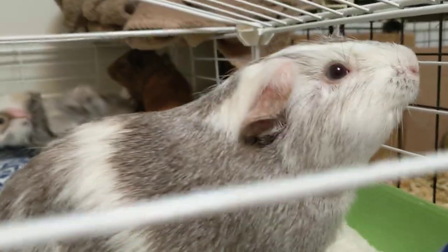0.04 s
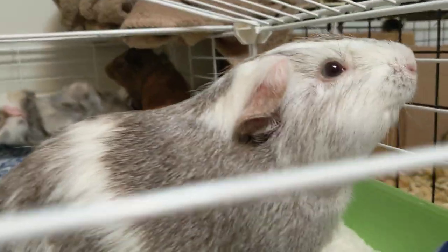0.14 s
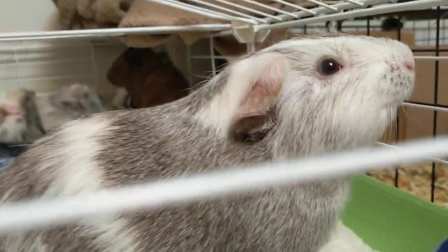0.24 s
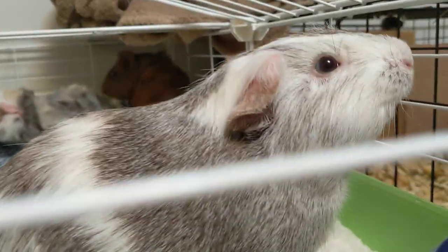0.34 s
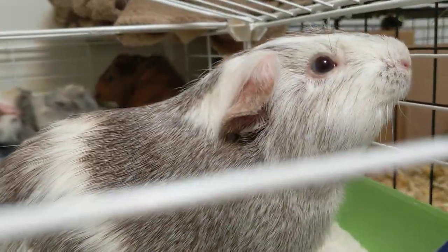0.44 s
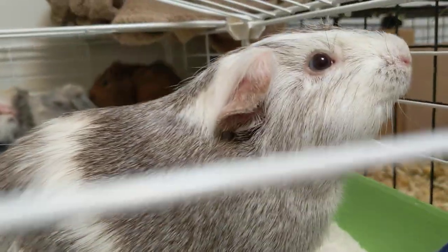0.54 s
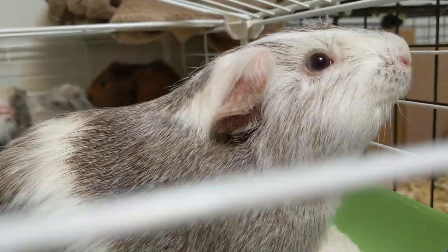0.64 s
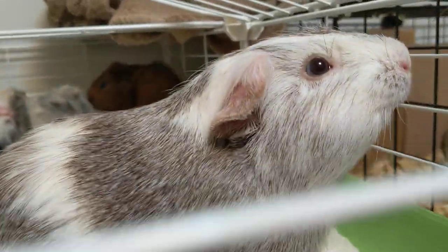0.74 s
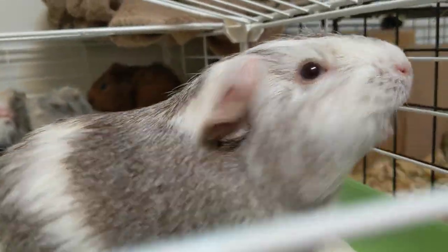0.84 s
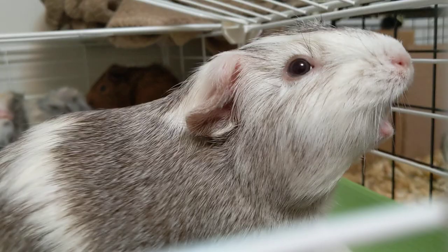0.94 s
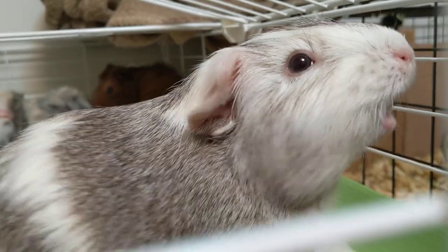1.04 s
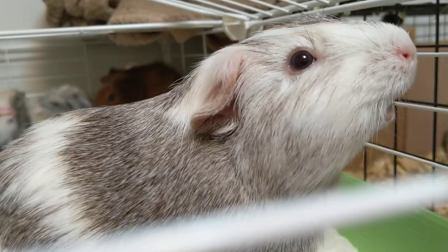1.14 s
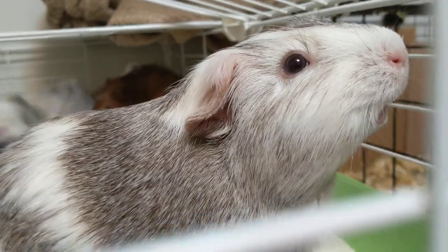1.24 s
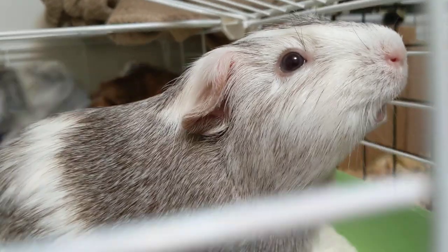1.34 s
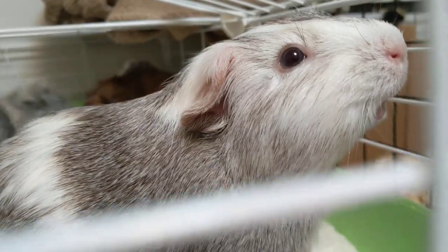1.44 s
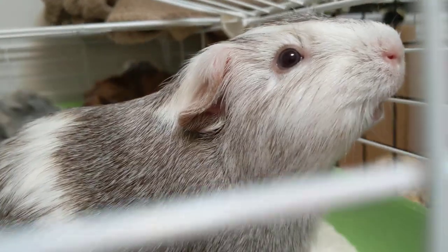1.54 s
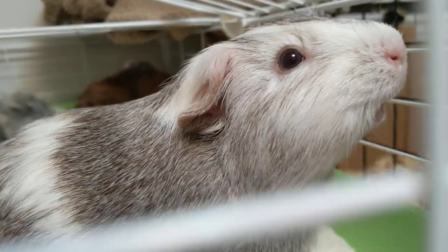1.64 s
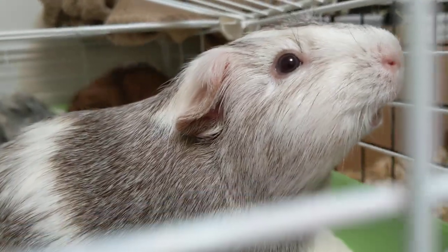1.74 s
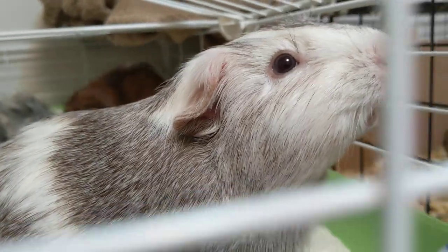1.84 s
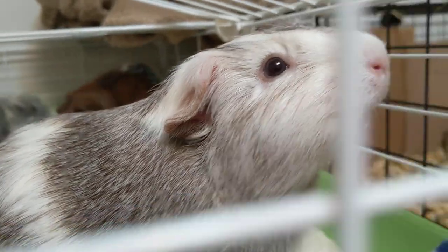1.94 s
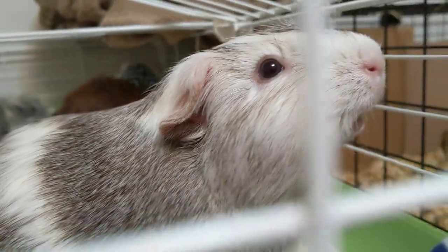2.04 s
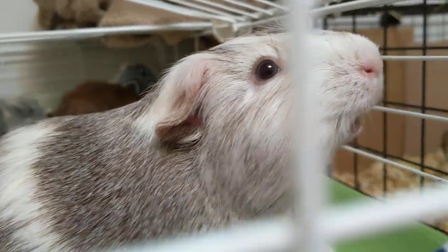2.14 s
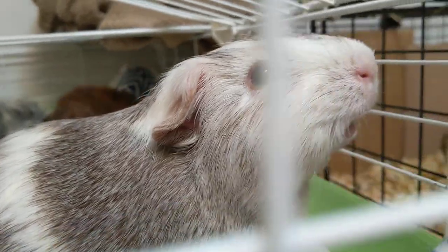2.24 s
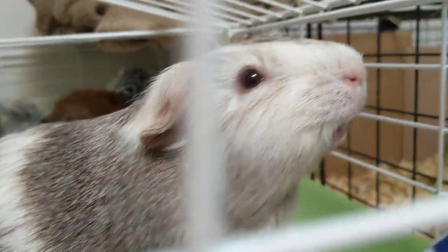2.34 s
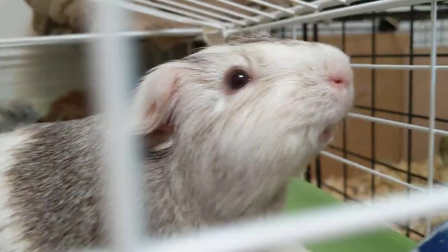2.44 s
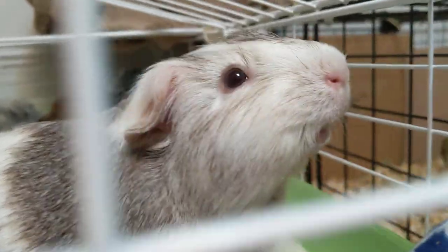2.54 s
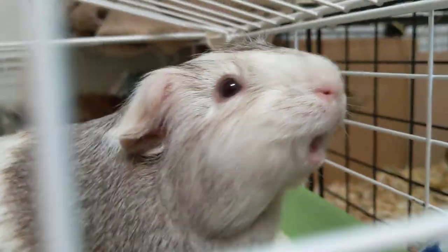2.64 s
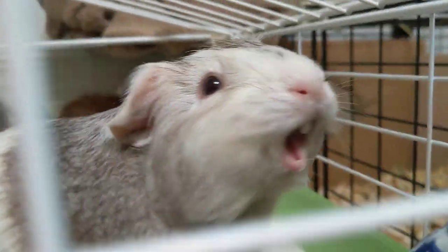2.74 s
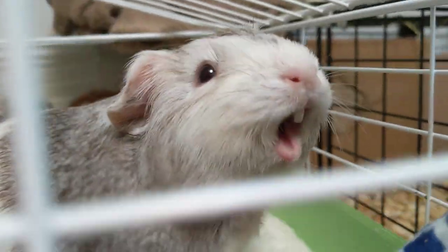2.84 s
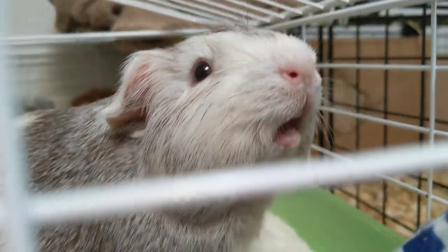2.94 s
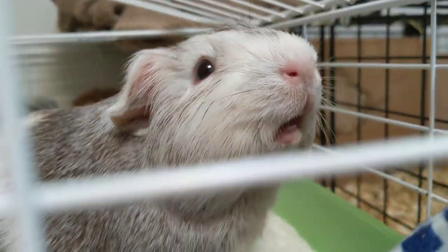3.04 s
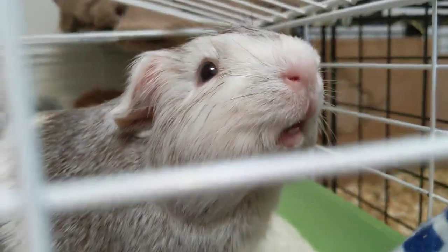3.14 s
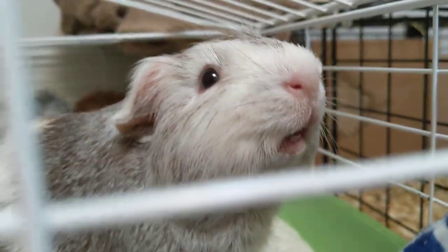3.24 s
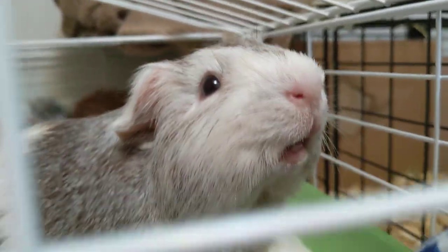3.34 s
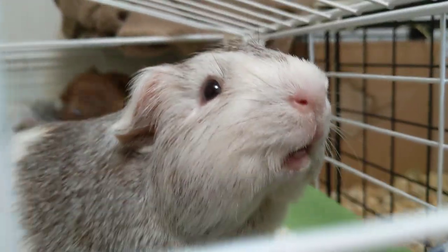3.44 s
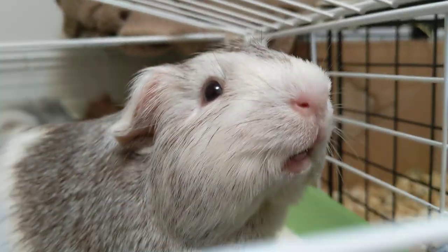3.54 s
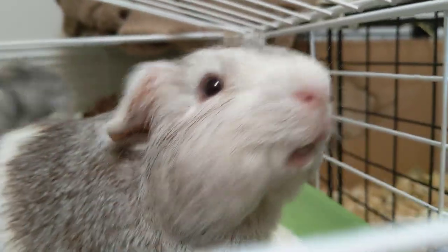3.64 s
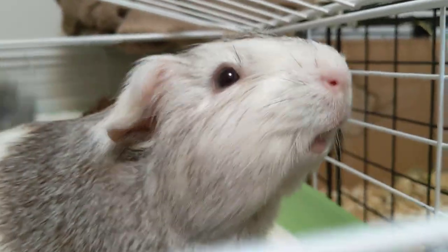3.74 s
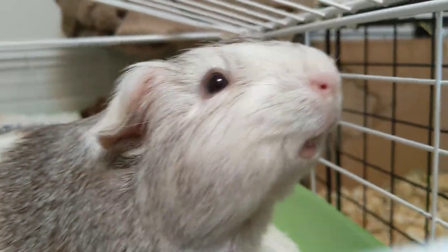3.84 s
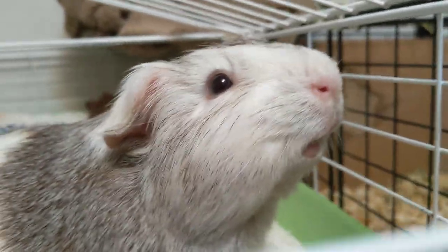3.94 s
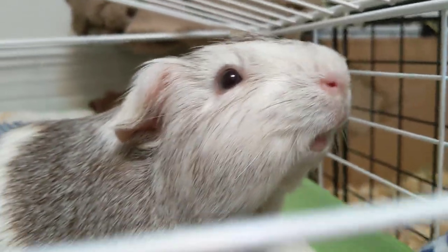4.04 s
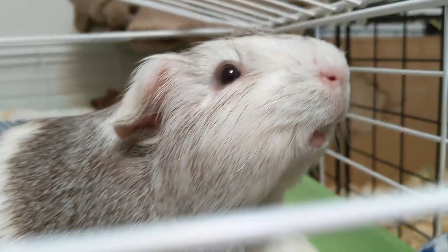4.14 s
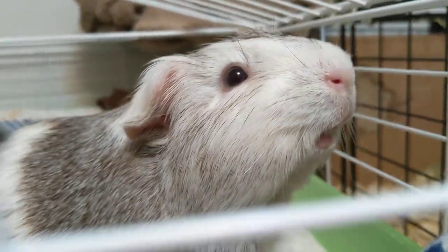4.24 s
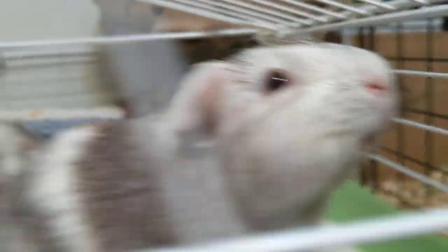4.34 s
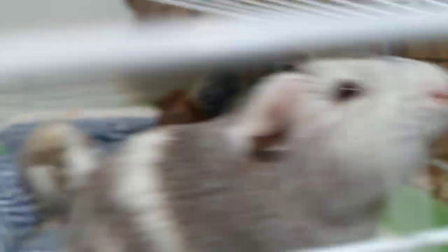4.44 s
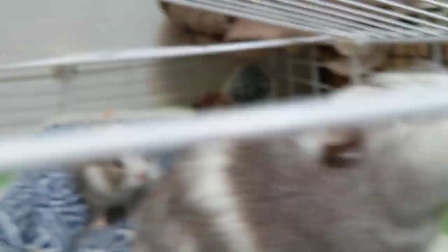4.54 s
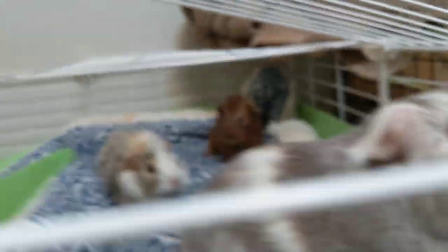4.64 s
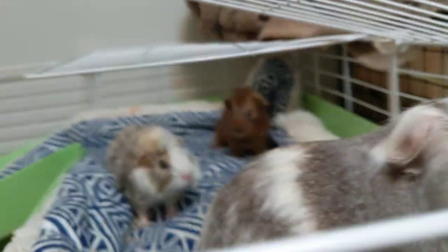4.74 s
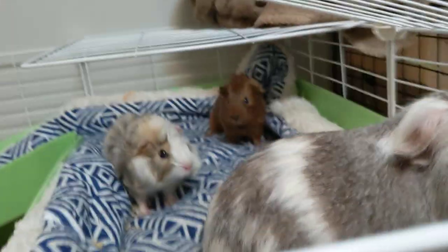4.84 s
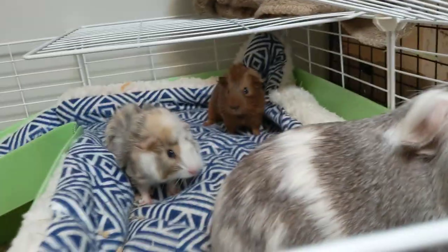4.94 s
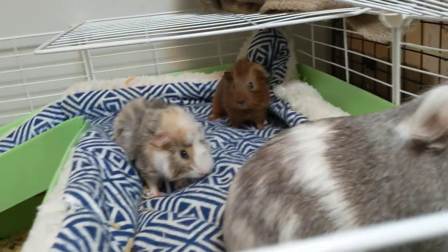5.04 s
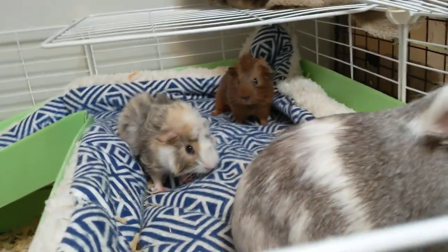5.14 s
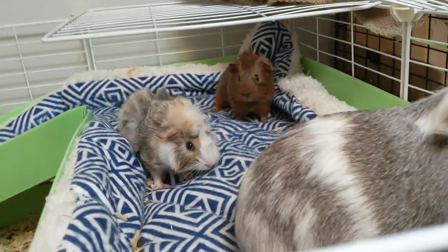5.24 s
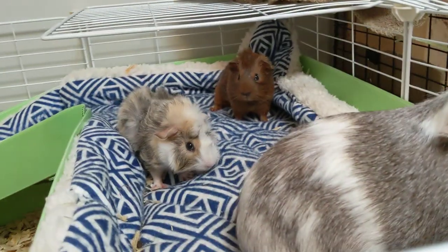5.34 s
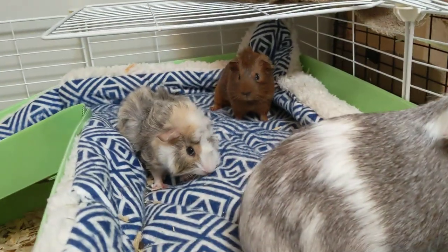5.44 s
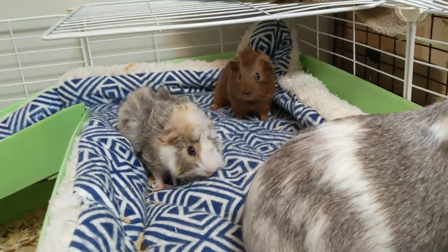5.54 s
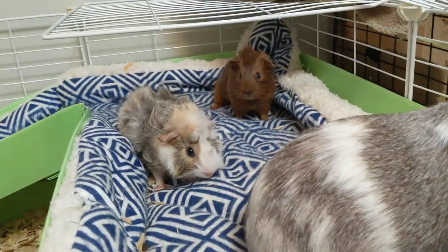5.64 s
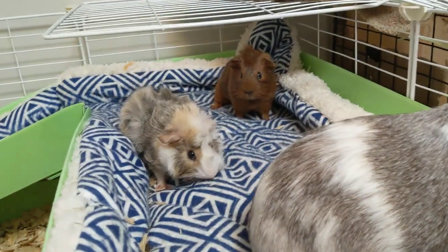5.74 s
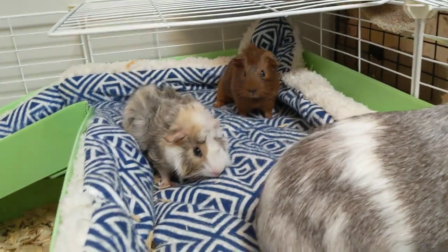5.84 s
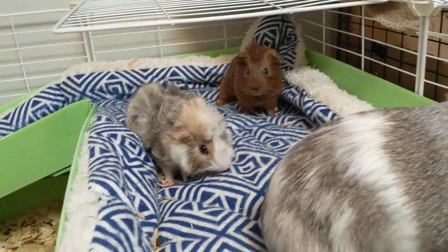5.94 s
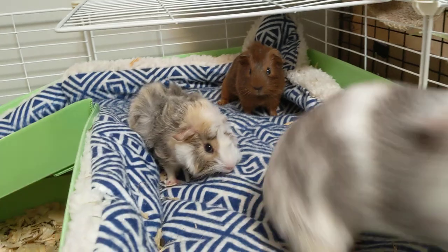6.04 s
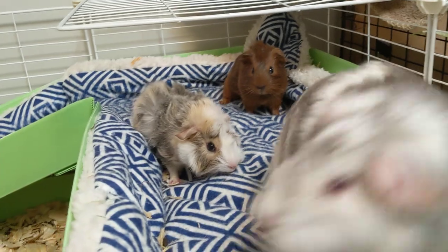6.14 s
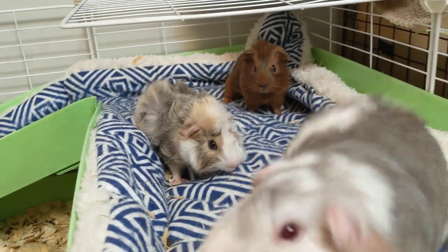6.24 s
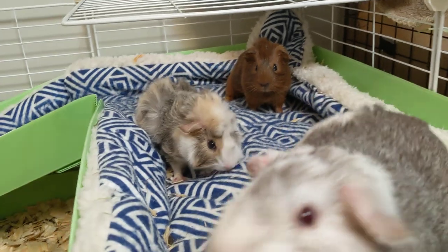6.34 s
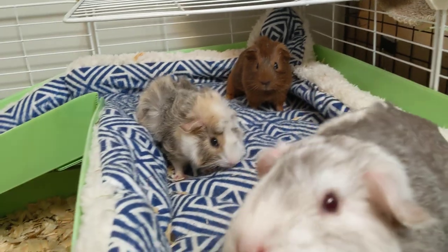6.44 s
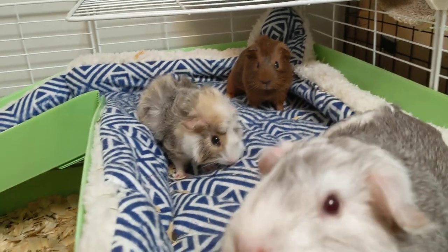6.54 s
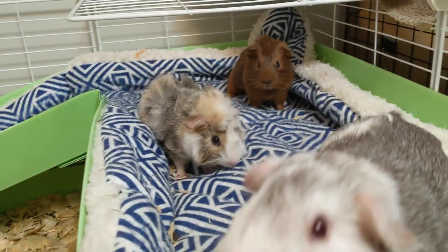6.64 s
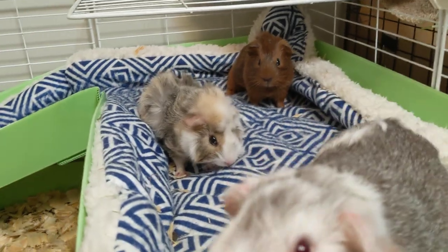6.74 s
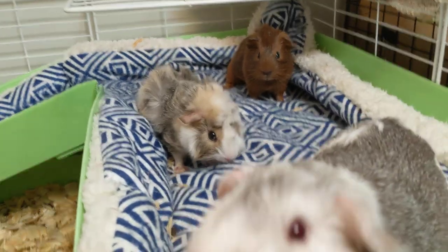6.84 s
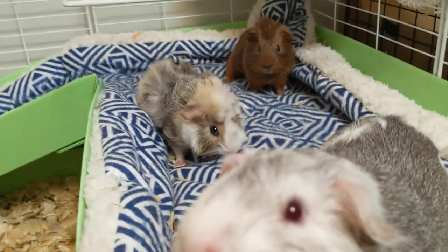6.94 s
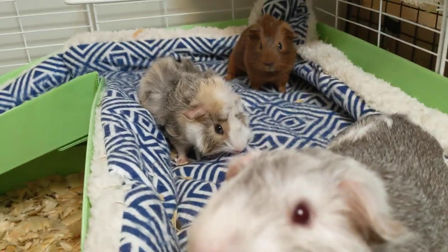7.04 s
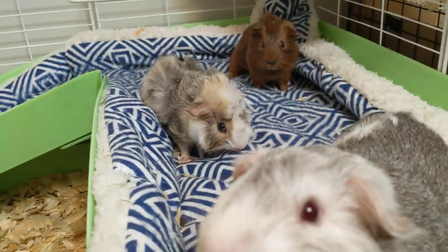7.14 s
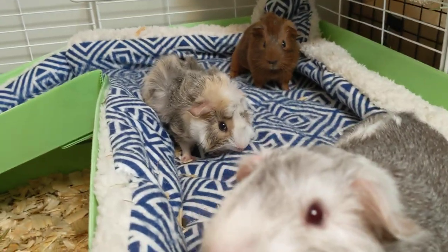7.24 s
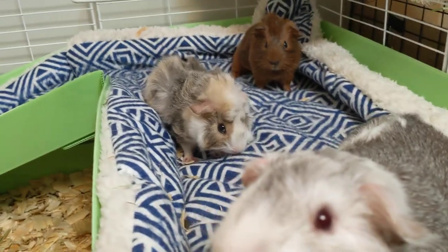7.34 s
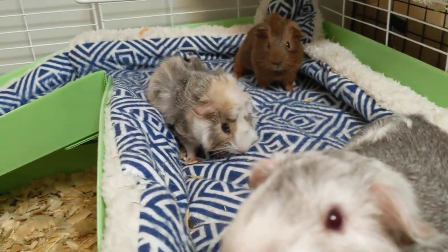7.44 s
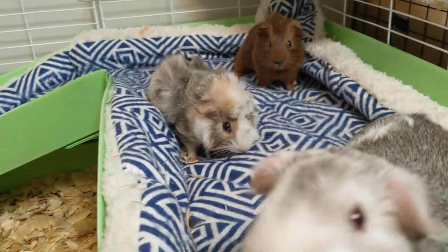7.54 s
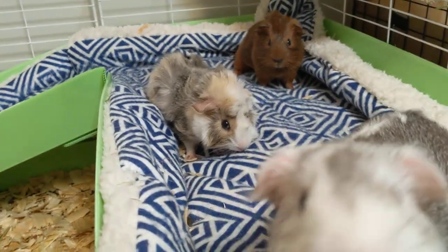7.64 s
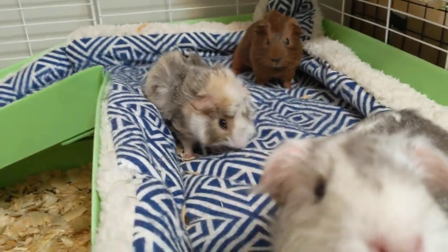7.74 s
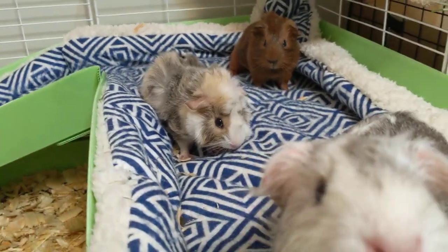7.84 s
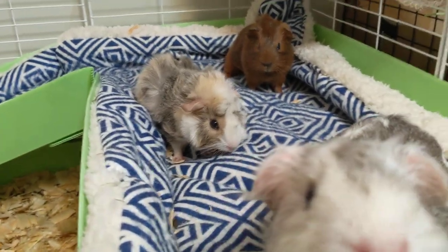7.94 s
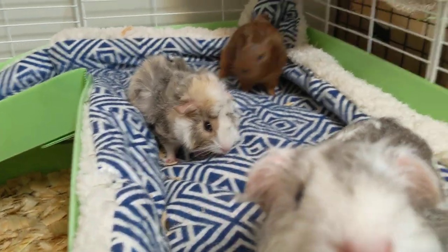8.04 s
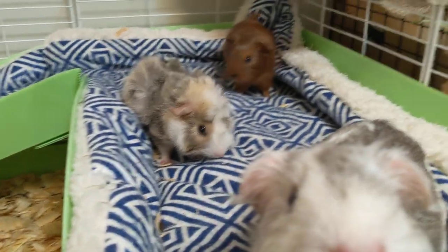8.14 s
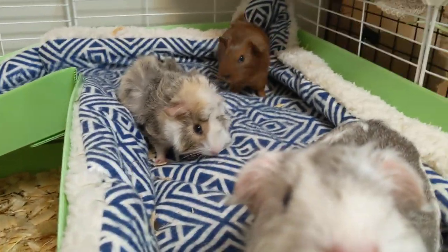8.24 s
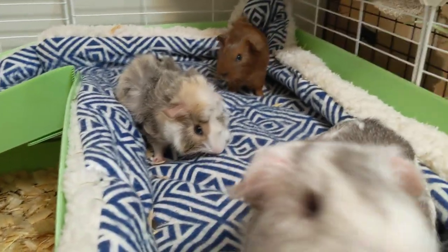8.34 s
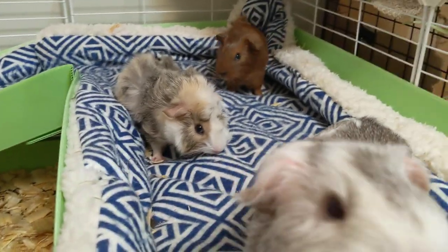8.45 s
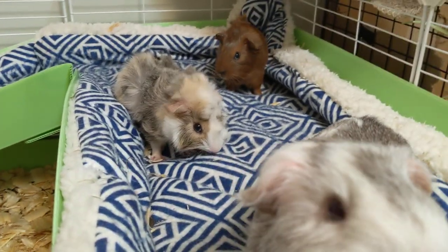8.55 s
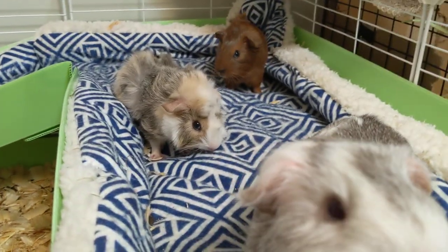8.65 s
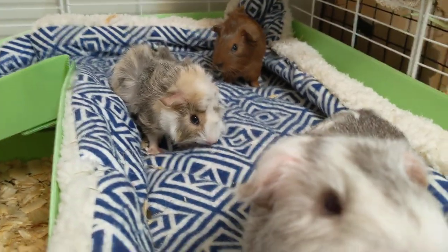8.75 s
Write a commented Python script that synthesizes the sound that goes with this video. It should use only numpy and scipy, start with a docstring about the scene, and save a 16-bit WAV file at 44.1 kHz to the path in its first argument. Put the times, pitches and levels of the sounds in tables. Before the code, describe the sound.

Guinea pigs in a wire cage, heard very near. Little throaty calls flick up in pitch between quiet chuts, soft footfalls and dry fabric rustling. Three short piercing whistles climb and brighten, with brief room echo. Movement thickens with crisp ticks before the third squeal; afterwards it calms, something knocks and rings the cage briefly, and a cluster of dull pops follows.

```python
"""Guinea pigs in a wire cage lined with fleece, close to a stereo microphone in a small room.
From the start paws rustle and tick (shaped noise) and soft calls glide up or chut low (harmonic stacks).
At about 1, 2.8 and 6.3 s one wheeks: a loud rising whistle, a stack of four harmonics.
Soft footfalls (decaying noise) and dull pops (band-passed pulses) come between the calls.
At 7.7 s something knocks on the cage (ringing modes); calls, rustle and pops go on to the end."""
import sys
import numpy as np
from scipy import signal
from scipy.fft import rfft, irfft, next_fast_len
from scipy.io import wavfile
from scipy.ndimage import uniform_filter1d

SR = 44100
rng = np.random.default_rng(int(sys.argv[2]) if len(sys.argv) > 2 else 0)


def wav_out(sig):
    """Save sig, one row per channel (or a flat mono array), as 16-bit PCM at SR to the path in sys.argv[1]."""
    wavfile.write(sys.argv[1], SR, np.round(np.clip(np.atleast_2d(sig).T, -1, 1) * 32767).astype(np.int16))


N = 388521
TIME_S = np.arange(N) / SR

# Levels in the tables are relative; noise spectra are in relative dB per Hz.
# Quiet air of the room: (frequency [Hz], level [dB])
AIR_SPECTRUM = [(20, 5), (50, -0.5), (100, -11), (200, -21), (775, -20), (1200, -30), (1600, -18),
                (2000, -33), (3200, -24.5), (5000, -23.5), (8300, -26.5), (11600, -28), (15800, -34)]
AIR_DB = -59.5
# Left-right likeness of noise: (frequency [Hz], correlation [-1..1])
EAR_LIKENESS = [(60, 0.97), (290, 0.47), (640, 0.69), (1400, .4), (3100, 0), (15000, 0.0073)]

# Steps and shifts on the bedding:
# (time [s], length [s], fleece hiss [dB], scuffing [dB], soft weight [dB])
SHUFFLES = [(0.0, 0.13, -67.5, -63.5, -74), (0.282, 0.15, -72, -66.5, -79),
            (0.416, 0.13, -67.5, -68, -67.5), (0.584, 0.21, -64.5, -71, -73.5),
            (0.96, 0.24, -56.5, -72, -71.5), (1.334, 0.16, -64, -62.5, -64.5),
            (1.556, 0.3, -85, -70.5, -67.5), (1.919, 0.2, -69.5, -68, -69.5),
            (2.209, 0.17, -63, -68, -68.5), (2.625, 0.21, -60, -63.5, -70),
            (2.73, 0.35, -56.5, -69.5, -71.5), (3.179, 0.095, -62, -69, -77), (3.357, 0.1, -64.5, -69, -71),
            (3.598, 0.3, -68, -64, -66), (3.867, 0.12, -80, -85.5, -61.5),
            (4.171, 0.027, -66.5, -80, -65.5), (4.388, 0.073, -78, -71, -70), (4.811, 0.092, -66, -59, -69),
            (4.977, 0.15, -63, -73.5, -80), (5.105, 0.23, -62.5, -70, -70), (5.479, 0.25, -62, -65, -68),
            (5.708, 0.27, -56.5, -56.5, -63), (5.925, 0.41, -60.5, -59.5, -62.5),
            (6.177, 0.35, -54.5, -61.5, -60.5), (6.56, 0.5, -67.5, -65.5, -67),
            (6.976, 0.21, -69.5, -68, -74.5), (7.517, 0.062, -64, -67.5, -68),
            (7.622, 0.18, -66.5, -69.5, -77), (7.8, 0.48, -74, -74, -67), (8.04, 0.09, -63.5, -69, -84),
            (8.216, 0.63, -75, -79.5, -75.5), (8.567, 0.23, -64.5, -64.5, -66)]
# Each builds over this share of its length, eases by EASE_DB, then settles
PUSH_SHARE, EASE_DB, SETTLE_S = 0.17, -5.5, 0.027
FIDGET_REL_DB = -79.5  # stirring that never stops
# Noise of fleece, scuffing and pressing weight: (frequency [Hz], level [dB])
HISS_SPECTRUM = [(1500, -23), (3000, -2), (5000, 1), (7500, -3), (10000, -5), (15000, -12)]
SCUFF_SPECTRUM = [(250, -25), (600, 1.5), (900, 1), (1500, -0.5), (2200, -1), (3500, -1.5), (6000, -25)]
WEIGHT_SPECTRUM = [(25, 3.5), (55, 0), (120, -3), (250, -1), (450, -2), (900, -13.5), (2000, -43.5)]

# Caller's head: (time [s], left-right level [dB], lead of left ear [ms], wheek sent into room [dB])
HEAD = [(0, 0, .08, -10), (.98, -3, .18, -9.5), (1.35, -1, .18, -10.4), (2.77, 0, .22, -14),
        (3.2, -1, .12, -14), (4, 1, .1, -10), (6.28, 3.5, .18, -10), (6.64, 1, .1, -8.5),
        (7.1, 5, .12, -8.5)]
# Voice splits to half its pitch: (time [s], half length [s], half-pitch lines [dB])
CROAKS = [(1.387, 0.0203, -14), (3.218, 0.026, -9)]
# Rasp in the voice: (frequency [Hz], level [dB])
RASP_SPECTRUM = [(200, -5.5), (700, -4.5), (1400, 4.5), (2000, -6), (3200, -3.5), (6000, -6.5),
                 (12000, -18)]
# Vocal tract, mouth nearly shut: (frequency [Hz], gain [dB])
THROAT_RESPONSE = [(300, 0.5), (1300, 4.5), (1900, -9), (2500, 0), (3100, 3), (3700, 2.5), (4600, -6.5),
                   (8000, -18)]
# Vocal tract, mouth wide open: (frequency [Hz], gain [dB])
MOUTH_RESPONSE = [(3000, 0), (3600, 1.5), (4200, -2.2), (7000, 4.5), (8500, 1), (10000, -9), (12000, 5.5),
                  (14500, 2.5)]

# Soft upward calls: (time [s], length [s], attack [s], low pitch [Hz], pitch after climb [Hz],
# mid-climb after start [s], slowness of climb [s], level [dB], level change after climb [dB],
# second harmonic on low note [dB])
GLIDES = [(0.005, 0.26, 0.0013, 565, 1475, .086, 0.013, -47, 3, -5),
          (0.925, .048, 0.022, 2356, 3030, 0.031, 0.0075, -57.5, 12, -12),
          (1.358, 0.13, 0.0029, 625, 2346, .065, .0125, -45.5, -7, -5),
          (1.873, .112, 0.09, 590, 1390, 0.078, 0.016, -45, -13, -16),
          (3.183, .167, 0.0019, 620, 1370, .062, 0.0078, -46.5, 0, -6),
          (3.35, 0.15, .02, 1432, 3370, 0.089, 0.012, -54.5, 8.5, -1),
          (3.635, 0.13, 0.011, 637, 1610, .068, .02, -45.5, 1.5, -15),
          (3.688, 0.14, 0.021, 1090, 2440, .03, 0.014, -47.5, -5, 2),
          (3.986, .144, 0.0066, 648, 1424, 0.065, 0.012, -45, -5, -12),
          (4.4, 0.039, 0.023, 641, 1188, 0.0215, 0.0097, -55, 1, -13),
          (4.735, 0.042, .02, 677, 900, 0.011, 0.0046, -62, -2.5, -23),
          (6.07, 0.16, 0.011, 670, 2514, .056, .02, -47, 8.5, -9),
          (6.641, .12, 0.0065, 582, 1174, 0.064, 0.0072, -45, -1, -8),
          (7.109, 0.085, 0.0063, 585, 1263, 0.064, .011, -50.5, 1, -9.5)]
SCOOP_HZ, SCOOP_S = 140, .009  # a glide starts this much sharp and drops onto its low note
DRIFT_OCTAVES_PER_S = 1.1  # upward creep after mid-climb
PURER_DB_PER_OCTAVE = 7  # overtones weaken as the voice climbs

# Ticks of claws and hay: (time [s], level [dB], middle band re treble [dB])
TICKS = [(0.039, -42, -13), (0.1352, -42.5, -19), (0.372, -43, -21), (0.4389, -39.5, -9.5),
         (0.631, -50.5, -2.5), (1.299, -44, -10), (1.6182, -42.5, -27), (2.245, -47, -28),
         (2.2728, -44, -43), (3.8155, -39, -6), (4.0724, -48.5, -15), (4.1884, -54.5, -20),
         (4.234, -49, -30.5), (4.447, -45, -27), (4.9765, -47.5, -21.5), (5.1374, -46.5, -4.5),
         (5.7683, -33, -17.5), (5.932, -34.5, -6.5), (6.0028, -39, -10.5), (6.039, -36, -11.5),
         (6.1283, -36, -12.5), (6.1945, -29.5, -27.5), (6.2634, -35.5, -6), (7.517, -46, -5.5),
         (8.0563, -46.5, 5), (8.1343, -49.5, 2), (8.344, -48.5, -4.5), (8.6249, -47, 2.5)]
# Treble, middle band and thin-stalk glint of a tick: (frequency [Hz], level [dB])
TICK_TREBLE = [(1500, -22.5), (4000, 1), (7000, 3), (11000, -3), (15500, -6)]
TICK_MIDDLE = [(80, -38.5), (250, -25), (600, -12), (2500, 0.5), (4000, 2), (7000, -16)]
TICK_GLINT = [(7000, -21), (11500, 3), (15000, -1)]

# Soft footfalls: (time [s], level [dB], t60 [s])
THUMPS = [(0.157, -59, 0.027), (2.245, -60, 0.15), (3.704, -44, 0.12), (3.906, -56, 0.11),
          (4.212, -68, 0.064)]
# Foot on padding: (frequency [Hz], level [dB])
THUD_SPECTRUM = [(25, 11), (60, 15), (150, -0.5), (430, 11), (800, -11), (3000, -13), (9000, -36)]

# Quiet chuts: (time [s], length [s], lowest pitch [Hz], level [dB])
CHUTS = [(0.225, 0.11, 644, -51), (0.508, 0.089, 621, -54), (1.266, 0.085, 531, -51.5),
         (1.584, 0.1, 578, -50.5), (2.213, 0.11, 634, -56.5), (2.905, 0.085, 652, -57),
         (3.138, 0.13, 604, -54), (3.434, 0.041, 665, -54.5), (3.553, 0.049, 555, -52),
         (3.598, 0.087, 607, -49.5), (3.879, 0.095, 640, -49.5), (4.087, 0.096, 613, -51.5),
         (4.328, 0.092, 589, -52.5), (4.873, 0.056, 664, -58.5), (4.958, 0.067, 668, -57),
         (6.481, 0.036, 638, -57), (7.944, 0.06, 624.4, -48.5), (8.215, 0.085, 674, -59),
         (8.561, 0.074, 702, -58)]
# Course of a chut: (share of length [0..1], pitch factor [ratio], level [dB])
CHUT_COURSE = [(0, 1.22, -5.5), (.18, 1.04, -2), (.42, 1, 0.5), (.66, 1.06, -4.5), (.86, 1.25, -1.5),
               (1, 1.55, -7.5)]

# Dull, dry pops close to the microphone: (time [s], peak [dB])
POPS = [(0.958, -41.5), (4.866, -39), (8.137, -34), (8.186, -33), (8.23, -32), (8.258, -49), (8.383, -33),
        (8.564, -38.5)]

# Loud whistles: (time [s], length [s], first pitch [Hz], top pitch [Hz], level [dB],
# second-harmonic offset [dB], drop to each further harmonic [dB], highest-treble gain [dB])
WHEEKS = [(0.974, 0.19, 3234, 4143, -22, -3.5, 19.5, 0), (2.776, 0.21, 3182, 4127, -18, -2.5, 11, -8),
          (6.288, 0.18, 3416, 4264, -18.5, -4.5, 24.5, 24)]
# Course of a wheek as the mouth opens:
# (share of length [0..1], share of climb [0..1], level [dB], second-harmonic offset [dB])
WHEEK_COURSE = [(0, 0, -3.5, -23.5), (.17, .17, -2.5, -16.5), (.33, .43, -4, -3), (.52, .69, 0, 0.5),
                (.71, .9, 0, -4.5), (.85, 1, -2, -12), (1, 0.93, -1.5, -3.5)]

# Contacts of the knock: (time [s], level [dB])
KNOCK_CONTACTS = [(7.737, -46), (7.7419, -32), (7.748, -37.5), (7.753, -37.5)]
# Ringing modes of the cage: (frequency [Hz], level [dB], t60 [s])
CAGE_MODES = [(470, -34, 0.12), (577, -6.5, 0.12), (642, -4.5, 0.045), (918, 3.5, 0.063),
              (1046, -2.5, 0.045), (1195, -8, 0.048), (1270, -3.5, 0.031), (1410, -8, 0.041),
              (1750, -14, 0.05), (2526, -6.5, 0.028), (3100, -8, 0.029), (3800, -13, 0.05),
              (4120, -14, 0.04)]

# Decay of the room's tail: (frequency [Hz], t60 [s])
ROOM_T60 = [(200, 0.28), (900, 0.3), (4000, 0.38), (8000, 0.32), (14000, 0.093)]
RECORDER_EDGE_HZ = 15900


def amp(db):
    """Decibels to gain."""
    return 10 ** (np.asarray(db) / 20)


def unit(x):
    """Scales to rms 1."""
    return x / np.sqrt(np.mean(x ** 2) + 1e-20)


def read(points, hz):
    """Interpolates a table on a log-frequency axis."""
    f, value = np.transpose(points)
    return np.interp(np.log(hz + 1), np.log(f + 1), value)


def add(mix, start_s, sound):
    """Mixes a sound in at a time."""
    part = mix[..., max(round(start_s * SR), 0):][..., :sound.shape[-1]]
    part += sound[..., :part.shape[-1]]


def colour(x, spectrum):
    """Filters by a spectrum."""
    n = x.shape[-1]
    size = next_fast_len(n)
    gain = amp(read(spectrum, np.fft.rfftfreq(size, 1 / SR)))
    return irfft(rfft(x, size) * gain, size)[..., :n]


def wander(n, rate_hz):
    """Random walk between knots, rms 1."""
    knots = rng.standard_normal(8192)
    # sqrt(1.5) makes up the power lost between knots
    return np.interp(np.arange(n) * rate_hz / SR, np.arange(8192), knots) * np.sqrt(1.5)


def noise(spectrum, n, band_hz=None):
    """Stereo noise, most alike in the bass, with rms 1 overall or within a band."""
    size = next_fast_len(n)
    hz = np.fft.rfftfreq(size, 1 / SR)
    a, b = rfft(rng.standard_normal((2, size)))
    same = np.clip(read(EAR_LIKENESS, hz), -1, 1)
    gain = amp(read(spectrum, hz))
    inside = (hz >= band_hz[0]) & (hz <= band_hz[1]) if band_hz else 1
    ears = np.array([a, same * a + np.sqrt(1 - same ** 2) * b]) * gain
    return irfft(ears, size)[:, :n] / np.sqrt(np.mean(gain ** 2 * inside))


def shuffling():
    """Power of hiss, scuffing and weight over time: every shuffle pushes, eases off and settles."""
    power = np.zeros((3, N))
    for start_s, length_s, *levels_db in SHUFFLES:
        t = np.arange(0, length_s + 10 * SETTLE_S, 1 / SR)
        push = np.minimum(t / (PUSH_SHARE * length_s), 1)
        ease = amp(EASE_DB * np.minimum(t / length_s, 1))
        settle = np.exp(-np.maximum(t - length_s, 0) / SETTLE_S)
        add(power, start_s, np.outer(amp(levels_db), push * ease * settle) ** 2)
    return power + amp(FIDGET_REL_DB) ** 2


def rustle(crackles_per_s=220, spread_db=5.5, fibre_s=0.0006):
    """Fleece hisses and crackles in small grains; bodies scuff and press on it."""
    hiss_db, scuff_db, weight_db = 10 * np.log10(shuffling())
    layers = [  # spectrum, level [dB], reference band [Hz], grain depth [dB]
        (HISS_SPECTRUM, hiss_db - 2.0, (4800, 6100), 2.2),
        (SCUFF_SPECTRUM, scuff_db - 3.5, (1900, 2300), 2.8),
        (WEIGHT_SPECTRUM, weight_db + 1.0, (150, 450), 1.5)]
    out = np.zeros((2, N))
    stroke_db = 2.2 * wander(N, 45)
    for spectrum, db, band_hz, grain_db in layers:
        out += noise(spectrum, N, band_hz) * amp(db + stroke_db + grain_db * wander(N, 500))
    size_db = spread_db * np.minimum(rng.exponential(1, N), 4)
    snaps = (rng.random(N) < crackles_per_s / SR) * amp(size_db)
    # each fibre lets go within a millisecond
    grain = rng.standard_normal((2, 256)) * np.exp(-np.arange(256) / SR / fibre_s)
    crackle = signal.oaconvolve(snaps[None], grain, axes=1)[:, :N]
    crackle = colour(crackle, [(300, -19.5), (1000, -7), (4500, 3.5), (9000, -4), (15500, -9.0)])
    return out + unit(crackle) * amp(hiss_db + 0.2)


def voice(rows, fall_db, jitter, shimmer_db, breath_db, attack_s, release_s, sag, count):
    """Vocal folds: a harmonic stack on a trembling pitch that sags as the call is let go."""
    s, *columns = np.transpose(rows)  # rows: time [s], pitch [Hz], level [dB], second harmonic [dB]
    t = np.arange(s[0], s[-1], 1 / SR)
    hz, db, second_db = (uniform_filter1d(np.interp(t, s, c), size=400, mode="nearest")
                         for c in columns)
    closing = np.clip(1 - (t[-1] - t) / release_s, 0, 1)
    tremble = jitter * (wander(len(t), 500) + .5 * wander(len(t), 70))
    hz = hz * (1 + tremble) * (1 - sag * closing ** 2)

    head_s, *head = np.transpose(HEAD)
    side_db, lead_ms, _ = (np.interp(s[0], head_s, c) for c in head)
    ears = np.array([[.5], [-.5]])
    phase = 2 * np.pi * (np.cumsum(hz) / SR + ears * hz * lead_ms / 10 ** 3)
    wave = np.sin(phase)
    for k in range(2, count + 1):
        below_nyquist = k * hz < SR / 2
        wave += amp(second_db - fall_db * (k - 2)) * below_nyquist * np.sin(k * phase)
    for when_s, half_s, half_db in CROAKS:  # strong and weak cycles alternate
        if s[0] < when_s < s[-1]:
            window = np.clip(1 - ((t - when_s) / half_s) ** 2, 0, 1)
            wave += amp(half_db) * window * (np.sin(phase / 2) + np.sin(phase + phase / 2))
    # air rasps through in each open phase
    wave += amp(breath_db) * noise(RASP_SPECTRUM, len(t)) * (1 + np.sin(phase))
    swell = np.clip((t - t[0]) / attack_s, 0, 1) * (1 - closing ** 2)
    swell = swell * amp(db + shimmer_db * wander(len(t), 150))
    return s[0], np.sqrt(2) * wave * swell * amp(ears * side_db)


def glides():
    """Soft calls: a low buzzy note, an S-shaped climb that turns pure, then a slow upward drift."""
    out = np.zeros((2, N))
    for (start_s, length_s, attack_s, low_hz, high_hz, middle_s, slowness_s,
         db, fade_db, second_db) in GLIDES:
        t = np.linspace(0, length_s, num=60)
        climb = .5 + .5 * np.tanh((t - middle_s) / slowness_s / 2)
        after = np.maximum(t - middle_s, 0)
        octaves = np.log2(high_hz / low_hz) * climb + DRIFT_OCTAVES_PER_S * after
        hz = low_hz * 2 ** octaves + SCOOP_HZ * np.exp(-t / SCOOP_S)
        level_db = db + fade_db * after / (after[-1] + 1e-9)
        rows = np.column_stack([start_s + t, hz, level_db, second_db - PURER_DB_PER_OCTAVE * octaves])
        add(out, *voice(rows, fall_db=5.5, jitter=.014, shimmer_db=1.5, breath_db=-22,
                        attack_s=attack_s, release_s=.008, sag=.03, count=5))
    return colour(out, THROAT_RESPONSE) * amp(-1.0)


def ticks(snap_s=0.0017, scrape_s=0.04, scrape_db=-12, delay_s=0.00069):
    """A claw snaps on a fibre or stalk and scrapes on briefly."""
    out = np.zeros((2, N))
    t = np.arange(3000) / SR
    fade = np.exp(-t / snap_s) + amp(scrape_db) * np.exp(-t / scrape_s)
    for start_s, db, middle_db in TICKS:
        burst = amp(-4.0) * noise(TICK_TREBLE, len(t))
        burst += amp(min(middle_db, 3) + 3.5) * noise(TICK_MIDDLE, len(t))
        # the thinner the stalk, the less middle and the more glint
        burst += amp(min(-34.5 - middle_db, 3)) * noise(TICK_GLINT, len(t))
        add(out, start_s + delay_s, amp(db) * burst * fade)
    return out


def thumps(onset_s=0.00037):
    """Feet land on the padded floor: noise with a quick onset and exponential decay."""
    out = np.zeros((2, N))
    t = np.arange(12000) / SR
    for start_s, db, t60_s in THUMPS:
        fade = amp(db + 6.5 - 60 * t / t60_s) * (1 - np.exp(-t / onset_s))
        add(out, start_s, noise(THUD_SPECTRUM, len(t)) * fade)
    return out


def chuts():
    """Short buzzy notes: the pitch dips, then flicks up, and the level falls away at the end."""
    out = np.zeros((2, N))
    for start_s, length_s, hz, db in CHUTS:
        rows = [(start_s + share * length_s, hz * bend, db + course_db, -8)
                for share, bend, course_db in CHUT_COURSE]
        add(out, *voice(rows, fall_db=2.5, jitter=.016, shimmer_db=2, breath_db=-21,
                        attack_s=.01, release_s=.01, sag=0, count=6))
    return colour(out, THROAT_RESPONSE) * amp(-5.5)


def pops(low_hz=600, high_hz=2000):
    """Single pushes of air with no ring: a band-passed pulse, slightly louder on the left."""
    out = np.zeros(N)
    pop = signal.firwin(161, [low_hz, high_hz], pass_zero=False, fs=SR)
    for start_s, db in POPS:
        add(out, start_s, amp(db - 1.5) * pop / abs(pop).max())
    return out * amp([[1.], [-1.]])


def wheeks():
    """Loud whistles that climb, swell and brighten as the mouth opens, then level off."""
    out = np.zeros((2, N))
    for start_s, length_s, first_hz, top_hz, db, second_db, fall_db, edge_db in WHEEKS:
        rows = [(start_s + share * length_s, first_hz + climb * (top_hz - first_hz),
                 db + swell_db, second_db + bright_db)
                for share, climb, swell_db, bright_db in WHEEK_COURSE]
        start_s, whistle = voice(rows, fall_db, jitter=.0018, shimmer_db=.9, breath_db=-50,
                                 attack_s=.003, release_s=.01, sag=.13, count=4)
        add(out, start_s, colour(whistle, [(12900, 0), (13900, edge_db)]))
    return colour(out, MOUTH_RESPONSE)


def knock(crack_db=-9, crack_s=0.011, bass_cut_hz=380):
    """Each contact cracks and sets the cage's modes ringing; the bass of the knock is cut away."""
    out = np.zeros((2, 12000))
    t = np.arange(9000) / SR
    first_s = KNOCK_CONTACTS[0][0]
    for start_s, db in KNOCK_CONTACTS:
        ring = sum(amp(mode_db - 60 * t / t60_s)
                   * np.sin(2 * np.pi * hz * t + rng.normal(0, 1., (2, 1)))
                   for hz, mode_db, t60_s in CAGE_MODES)
        crack = amp(crack_db) * noise(TICK_MIDDLE, len(t)) * np.exp(-t / crack_s)
        add(out, max(start_s - first_s, 0), amp(db) * (ring + crack))
    high_pass = signal.butter(2, bass_cut_hz, "high", fs=SR, output="sos")
    placed = np.zeros((2, N))
    add(placed, first_s, signal.sosfilt(high_pass, out))
    return placed


def room(x, near_db, tail_db, near_s=.013, taps_per_s=5000):
    """Quick echoes from the cage and nearby wall, then the room's short tail."""
    n = SR * 5 // 8
    t = np.arange(n) / SR
    taps = rng.choice([-1., 1.], (2, n)) * (rng.random((2, n)) < taps_per_s / SR)
    near = taps * (t > .0025) * np.exp(-t / near_s)
    diffuse = rng.standard_normal((2, n)) * np.clip(t / 0.0054, 0, 1)
    hz, when_s, z = signal.stft(diffuse, SR, nperseg=256)
    decay = amp(-60 * when_s / read(ROOM_T60, hz)[:, None])
    tail = signal.istft(z * decay, SR, nperseg=256)[1][:, :n]
    echo = (amp(near_db) * unit(near) + amp(tail_db) * unit(tail)) / np.sqrt(n)
    return signal.oaconvolve(x, echo, axes=1)[:, :N]


def scene():
    """Voices and movement over the room's air; a head turned away sends more into the room."""
    close = glides() + ticks()
    farther = thumps() + chuts() + knock()
    loud = wheeks()
    head_s, _, _, send_db = np.transpose(HEAD)
    echoes = room(loud * amp(np.interp(TIME_S, head_s, send_db)), near_db=0, tail_db=-1)
    echoes += room(close, near_db=-6.5, tail_db=-14.5)
    echoes += room(farther, near_db=-5.5, tail_db=-6.5)
    air = amp(AIR_DB) * noise(AIR_SPECTRUM, N)
    return loud + close + farther + echoes + pops() + rustle() + air


def record(dry):
    """The recorder's band limit: a steep linear-phase low-pass."""
    low_pass = signal.firwin(511, RECORDER_EDGE_HZ, window=("kaiser", 9), fs=SR)
    return signal.oaconvolve(dry, low_pass[None], "same")


dry = scene()
out = record(dry)
wav_out(out)
```